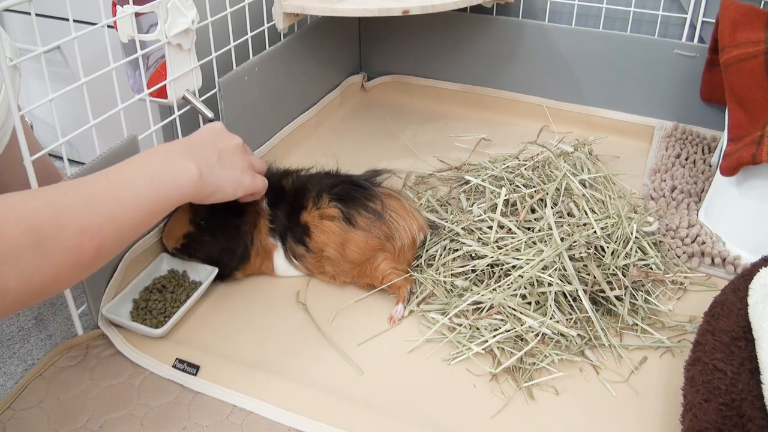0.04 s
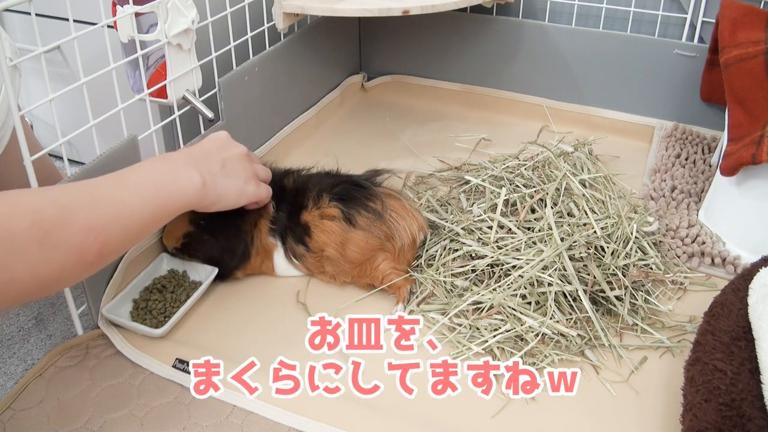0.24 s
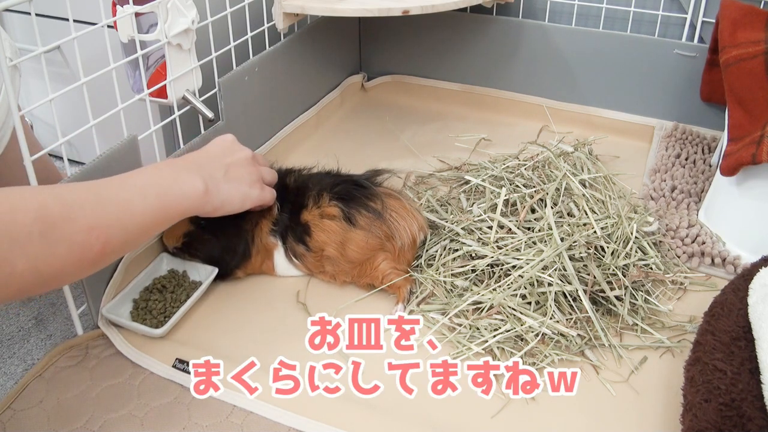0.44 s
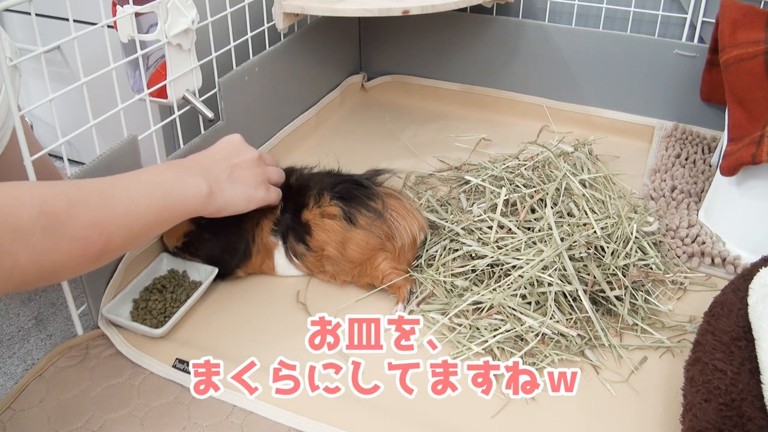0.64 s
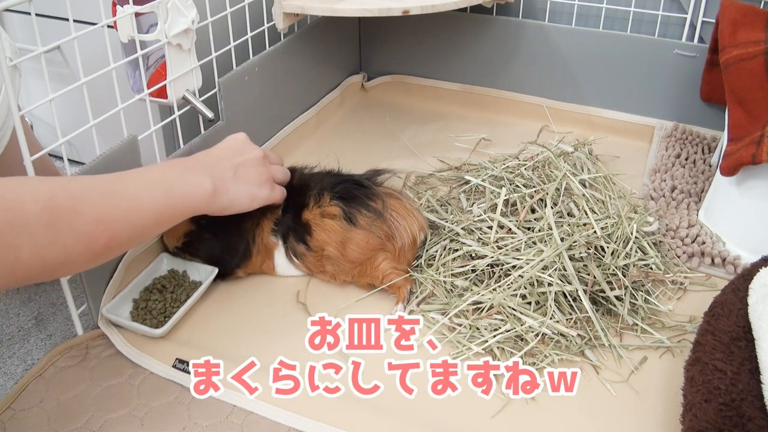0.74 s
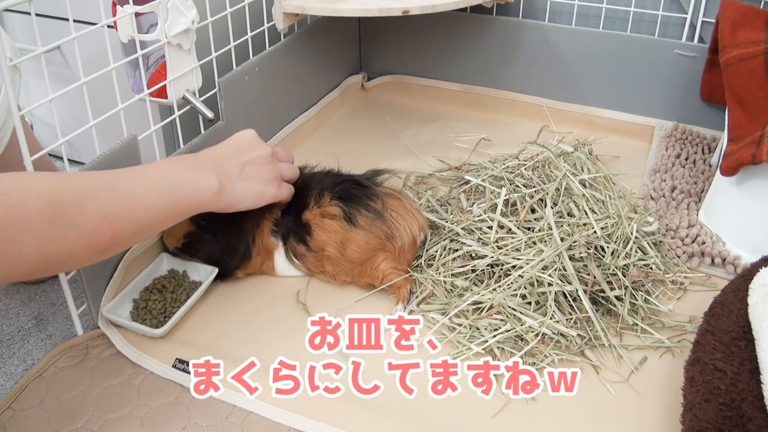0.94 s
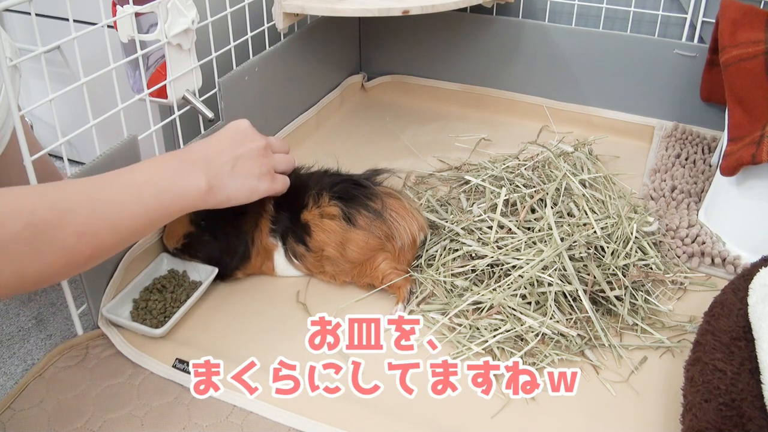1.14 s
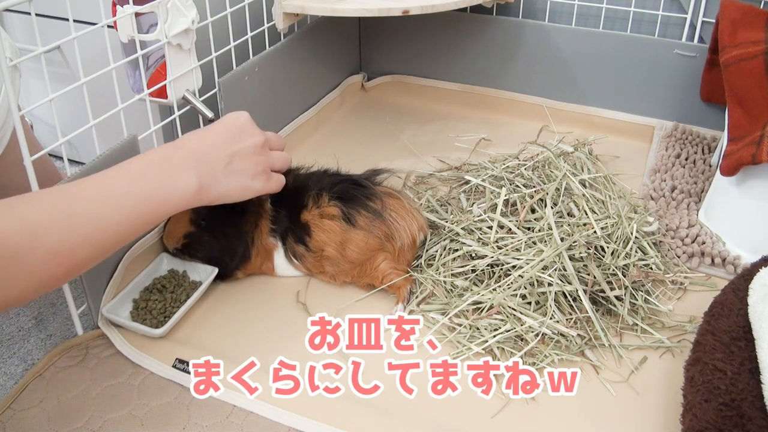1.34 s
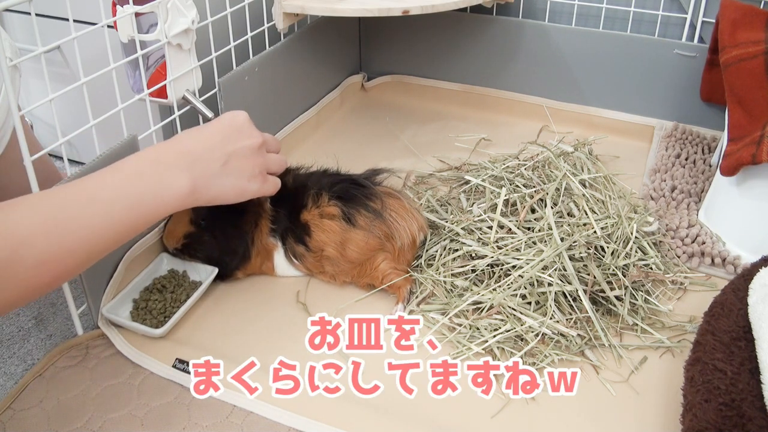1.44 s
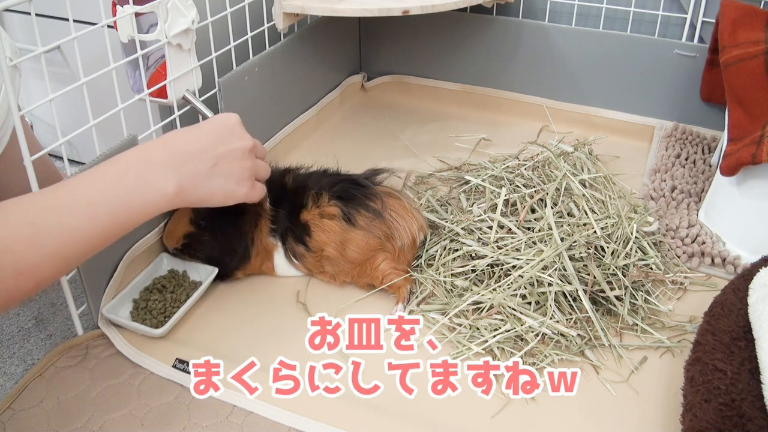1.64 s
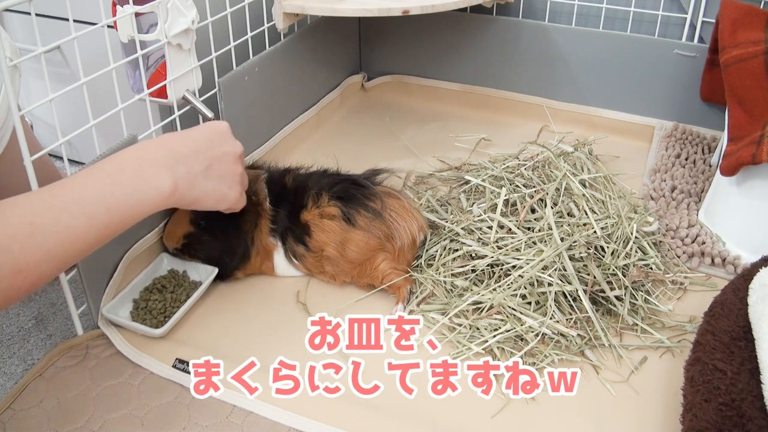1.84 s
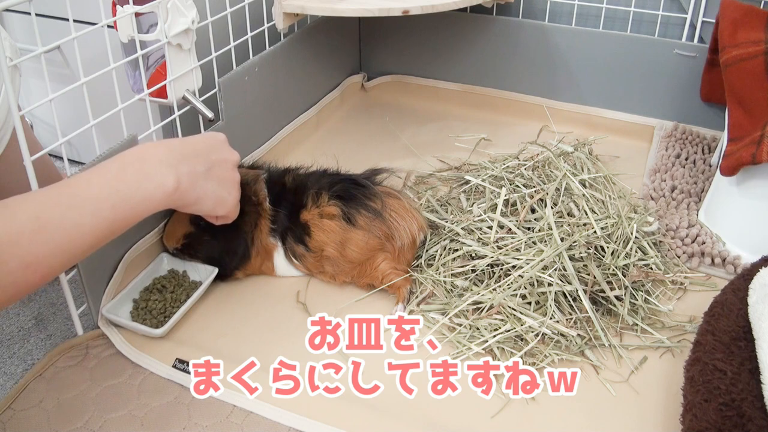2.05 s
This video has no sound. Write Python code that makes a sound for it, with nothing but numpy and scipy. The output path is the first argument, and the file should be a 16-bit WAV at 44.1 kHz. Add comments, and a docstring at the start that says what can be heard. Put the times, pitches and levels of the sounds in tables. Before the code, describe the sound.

Close by in a small room, a guinea pig makes two quick runs of tiny purring pips and grunts, followed by sparse, lower chuts. Faint stroking rustle and a few dull bumps sit over a quiet ventilation hum.

```python
"""A guinea pig purrs in two short bursts, then gives a few soft low chuts, as its head is stroked.
Each burst is a run of tiny voiced notes: clean hoots, pips that open with a click, rough falling grunts.
It sits in its pen close to a stereo pair of microphones, a little to the left, in a small room.
Fur and hay rustle faintly under the hand, with a few dull bumps; ventilation hums behind."""
import sys
import numpy as np
from scipy import signal
from scipy.fft import rfft, irfft
from scipy.io import wavfile

SR = 44100
rng = np.random.default_rng(int(sys.argv[2]) if len(sys.argv) > 2 else 0)


def wav_record(signal):
    """Record a signal, one row per channel, as 16-bit PCM in the file named by sys.argv[1]."""
    frames = np.transpose(np.atleast_2d(signal))
    bounded = np.clip(frames, -1, 1)
    # unit amplitude maps onto the largest positive 16-bit level
    quanta = np.round(bounded * 32767).astype(np.int16)
    wavfile.write(sys.argv[1], SR, quanta)


N = 92610
TIME = np.arange(N) / SR


def from_db(db):
    """Decibels to gain."""
    return 10 ** (np.asarray(db) / 20)


def unit_rms(x):
    """Scale to an rms of 1."""
    return x / np.sqrt(np.mean(x ** 2) + 1e-20)


def at_hz(table, hz):
    """Read a table on a log-frequency axis."""
    table_hz, values = np.transpose(table)
    return np.interp(np.log(np.maximum(hz, 1)), np.log(table_hz), values)


def colour(noise, spectrum):
    """Filter a noise by a table of gains, then scale it to unit rms."""
    size = noise.shape[-1]
    gain = from_db(at_hz(spectrum, np.fft.rfftfreq(size, 1 / SR)))
    return unit_rms(irfft(rfft(noise) * gain, size))


def drift(rate_hz):
    """A smooth random wander of about unit rms, mostly slower than rate_hz."""
    hz = np.fft.rfftfreq(2 * N, 1 / SR)
    slow = rfft(rng.standard_normal(2 * N)) / (1 + (hz / rate_hz) ** 2)
    return unit_rms(irfft(slow))[:N]


# How alike the two microphones hear a diffuse sound: frequency_hz, correlation
MIC_LIKENESS = [(60, 0.97), (120, 1), (240, 0.57), (480, 0.3), (950, -0.086), (1890, -0.097), (3770, 0.049),
                (7520, 0.26), (15000, 1)]
def diffuse(noise_pair, spectrum):
    """Two unrelated noises become one sound all around the microphones, nearly mono in the bass."""
    alike = np.clip(at_hz(MIC_LIKENESS, np.fft.rfftfreq(N, 1 / SR)), -.99, .995)
    mid, side = rfft(noise_pair) * np.sqrt([1 + alike, 1 - alike])
    return colour(irfft([mid + side, mid - side], N), spectrum)


# Rush of air in the room behind the pen: frequency_hz, gain_db
AIR_SPECTRUM = [(12, -32), (20, -17), (38, -8.5), (106, -1.5), (252, -9.5), (289, -7), (371, -6),
                (404, -5.5), (580, -7), (704, -7), (856, -8), (957, -7.5), (1720, -11), (2530, -14.5),
                (5680, -28), (7290, -33.5), (15500, -56.5)]
# Hum lines of the ventilation: pitch_hz, level_db
HUM_LINES = [(40, -64), (94, -66), (236.5, -64.5), (357.5, -61), (592, -68.5)]
def ventilation(air_db=-48, hum_waver=.31, wander_hz=1.32):
    """A steady rush of air fills the room, with a wavering hum in the centre."""
    hum = np.zeros(N)
    for hz, db in HUM_LINES:
        amplitude = np.sqrt(2) * from_db(db) * (1 + hum_waver * drift(rate_hz=12))
        cycles = rng.random() + np.cumsum(hz + wander_hz * drift(rate_hz=4.3)) / SR
        hum += amplitude * np.sin(2 * np.pi * cycles)
    return hum + from_db(air_db) * diffuse(rng.standard_normal((2, N)), AIR_SPECTRUM)


# Course of the rustle under the hand: time_s, level_db
STROKE_LEVELS = [(0, -63), (.15, -78), (.22, -69.5), (.45, -68), (.7, -66), (.83, -65), (.87, -62.5),
                 (.97, -58.5), (1.02, -64.5), (1.16, -64.5), (1.38, -70), (1.7, -66), (1.9, -70),
                 (2.1, -68.5)]
# Fur and hay, heard from beside the pen: frequency_hz, gain_db
RUSTLE_SPECTRUM = [(800, -13), (2000, -3.5), (4000, -1), (7000, -9), (10000, -22), (15000, -26)]
def stroking(grains_per_s=6600, spread_db=5.5, patchy_db=3):
    """Fur and hay shift under the hand in a faint, patchy stream of tiny ticks."""
    sizes = from_db(spread_db * np.minimum(rng.exponential(1, (2, N)), 4))
    signs = rng.choice([-1, 1], (2, N))
    grains = sizes * signs * (rng.random((2, N)) < grains_per_s / SR)
    level_db = np.interp(TIME, *np.transpose(STROKE_LEVELS)) + patchy_db * drift(rate_hz=28)
    return from_db(level_db) * diffuse(grains, RUSTLE_SPECTRUM)


def swells(rows):
    """An envelope with one bell-shaped rise and fall for each row."""
    return sum(from_db(db) * np.exp(-.5 * ((TIME - centre) / width) ** 2) for centre, width, db in rows)


# Passes of the fingers through the fur: centre_s, width_s, level_db
FINGER_PASSES = [(.075, .008, -73), (.28, 0.0074, -71), (.366, .007, -74), (.52, .06, -75.5),
                 (.566, .008, -77), (.73, .0063, -67.5), (.83, 0.043, -77), (1.02, 0.016, -70),
                 (1.09, .028, -72), (1.145, .012, -72.5), (1.31, 0.048, -75), (1.435, .01, -74),
                 (1.51, .024, -73), (1.73, .015, -77), (1.87, .008, -77), (1.955, .017, -72.5)]
# Hiss of fur at close range: frequency_hz, gain_db
FUR_SPECTRUM = [(2000, -13), (5000, 1.5), (8500, 6), (12000, -2), (15000, -7)]
def brushing():
    """Each pass of the fingers through the fur is a short, airy swish."""
    return swells(FINGER_PASSES) * diffuse(rng.standard_normal((2, N)), FUR_SPECTRUM)


# The animal's notes, close up: start_s, length_s, attack_s, level_db, level_change_db,
# start_pitch_hz, middle_pitch_hz, end_pitch_hz, overtones_db, roughness (0 to 1)
PURR_AND_CHUT_NOTES = [ (0.209, 0.037, 0.021, -39, -1.5, 538, 715, 698, -10, 0.04),
                       (0.271, 0.0065, 0.0014, -31.5, -6.5, 830, 785, 820, -11, 0.1),
                       (.3039, 0.029, 0.0016, -32.5, 2, 708, 741, 738, -6, 0.06),
                       (0.334, 0.0079, 0.0014, -41.5, -7.5, 684, 667, 660, -1, 0.73),
                       (0.362, 0.0053, .002, -38.5, -2, 810, 836, 830, -16, 0),
                       (0.4039, 0.0122, 0.0022, -39, 0, 774, 629, 630, -3.5, 0.23),
                       (.416, 0.0236, .0012, -43, -3.5, 640, 687.4, 590, 2.5, 0.13),
                       (.452, 0.0061, .0035, -38, -3.5, 680, 704, 760, -8, 0.25),
                       (.648, 0.013, 0.0057, -49.5, -1.5, 423, 401, 380, -8.5, 0.37),
                       (.666, 0.031, .014, -46.5, -1.5, 791, 687, 563, 0.5, 0.55),
                       (0.7233, 0.0098, 0.0052, -32, -2, 825, 804, 793, -25, 0.02),
                       (0.7602, .017, 0.0014, -34, -4, 705, 618, 563, 0, 0.28),
                       (0.7772, .011, .0015, -42, -0.5, 613, 593, 580, 0, 0.76),
                       (.792, 0.0046, 0.0017, -41, -0.5, 640, 640, 600, -1, 0.7),
                       (.802, 0.0093, 0.0037, -46.5, 1, 554, 580, 640, -4, 0.77),
                       (0.8148, 0.012, 0.0036, -36.5, 0, 706, 775, 814, -13, 0.22),
                       (0.8573, 0.012, 0.0013, -38.5, -2, 580, 499, 448, -4.5, 0.43),
                       (0.874, 0.012, 0.0014, -43, -0.5, 490, 525, 530, 0.5, 0.52),
                       (0.885, 0.026, 0.0041, -46.5, -2.5, 550, 595, 532, 2.5, 0.17),
                       (.914, 0.014, .003, -48.5, -1, 563, 600, 650, -6, 0.48),
                       (1.197, 0.029, 0.0056, -40.5, -10.5, 332, 369.5, 356, -10, 0.2),
                       (1.233, 0.022, 0.0027, -51, 0, 507, 568, 570, -15, 0.83),
                       (1.272, 0.015, 0.0044, -47, -6, 343, 355, 340, -12, 0),
                       (1.647, .026, 0.0048, -37.5, -7, 347, 356.5, 383, -14.5, 0.08),
                       (1.748, 0.0059, 0.0032, -39, -2, 380, 380, 356, -17.5, 0),
                       (1.758, 0.012, .003, -44.5, -5, 374, 362, 360, -21, .1)]
# What throat and mouth pass of the overtones: frequency_hz, gain_db
THROAT_RESPONSE = [(400, -7), (750, 5.5), (1000, -1.5), (1220, 1.5), (1480, -14.5), (1800, -16), (2250, -8),
                   (2800, -21.5), (4200, -36), (8000, -69)]
# What they pass of the rasp: frequency_hz, gain_db
RASP_SPECTRUM = [(150, -3), (400, 10.5), (750, -1), (1200, 13), (1520, -23), (2300, -3.5), (3200, -19),
                 (5000, -42), (10000, -55)]
def voice(flutter_hz=230, jitter_depth=.12, shimmer_depth=.45, half_pitch_db=-8, rasp_db=1):
    """Gliding notes shaped by the throat; roughness shakes pitch and level and adds a pulsed rasp."""
    release_s = .002
    notes = np.zeros(N)
    jitter, shimmer = jitter_depth * drift(flutter_hz), shimmer_depth * drift(flutter_hz)
    rasp = from_db(rasp_db) * colour(rng.standard_normal(N), RASP_SPECTRUM)
    for start, length, attack, db, change_db, *pitches_hz, overtones_db, rough in PURR_AND_CHUT_NOTES:
        span = slice(int(start * SR), int((start + length + 10 * release_s) * SR))
        t = TIME[span] - TIME[span][0]
        progress = np.minimum(t / length, 1)
        hz = np.polyval(np.polyfit([0, .5, 1], pitches_hz, 2), progress)
        phase = 2 * np.pi * np.cumsum(hz * (1 + rough * jitter[span])) / SR
        overtones = sum(from_db(overtones_db + at_hz(THROAT_RESPONSE, k * hz)) * np.sin(k * phase)
                        for k in range(2, 10))
        alternation = from_db(half_pitch_db) * np.cos(phase / 2)   # strong and weak cycles take turns
        tone = np.sqrt(2) * (np.sin(phase) + overtones) * (1 + rough * (shimmer[span] + alternation))
        pulsed_rasp = rough * rasp[span] * (1 + .5 * np.cos(phase))
        envelope = np.minimum(t / attack, 1) * np.exp(-np.maximum(t - length, 0) / release_s)
        notes[span] += from_db(db + change_db * progress) * envelope * (tone + pulsed_rasp)
    return notes


def ring(x, hz, t60_s):
    """A resonance: a unit click starts a dying sine of height 1."""
    radius = np.exp(-np.log(1000) / (t60_s * SR))
    angle = 2 * np.pi * hz / SR
    return signal.lfilter([0, np.sin(angle)], [1, -2 * radius * np.cos(angle), radius ** 2], x + 1e-18)


# The throat snapping open or shut: start_s, level_db
THROAT_SNAPS = [(.247, -37), (0.2706, -36), (0.7255, -33)]
# Resonances of the mouth: pitch_hz, gain_db, t60_s
MOUTH_MODES = [(1176, 0.5, 0.017), (2180, -2, 0.012), (2710, -9.5, 0.017)]
def throat_clicks(soften_hz=3240):
    """Each snap of the throat rings the mouth for a few milliseconds."""
    snaps = np.zeros(N)
    for start, db in THROAT_SNAPS:
        snaps[int(start * SR)] = from_db(db)
    softened = signal.sosfilt(signal.butter(2, soften_hz, fs=SR, output="sos"), snaps + 1e-18)
    return sum(from_db(db) * ring(softened, hz, t60_s) for hz, db, t60_s in MOUTH_MODES)


# Tone of the walls' reflections around the pen: frequency_hz, gain_db
ROOM_SPECTRUM = [(150, 4), (400, -1.5), (750, 1), (1300, 4.5), (2500, 1), (8000, 2)]
def small_room(x, level_db=-10, t60_s=.33, delay_s=.0067):
    """Near walls return dense, quickly dying reflections, different at each microphone."""
    t = TIME[:SR // 2]
    decay = np.exp(-np.log(1000) * t / t60_s) * (t > delay_s)
    tails = colour(rng.standard_normal((2, len(t))), ROOM_SPECTRUM) * decay
    tails /= np.sqrt(np.sum(tails ** 2, axis=1, keepdims=True))
    return from_db(level_db) * signal.fftconvolve(x[None], tails, axes=1)[:, :N]


def guinea_pig(lean_db=5.5, lean_above_hz=1070):
    """The animal up close, its upper voice stronger at the left microphone, the room behind it."""
    direct = voice() + throat_clicks()
    upper = signal.sosfiltfilt(signal.butter(2, lean_above_hz, "high", fs=SR, output="sos"), direct)
    lower = direct - upper
    mic_gains = from_db([[lean_db / 2], [-lean_db / 2]])
    return lower + upper * mic_gains + small_room(direct)


# Soft low bumps: centre_s, width_s, level_db
BUMP_SWELLS = [(.28, .03, -53), (.45, 0.011, -46), (.6, .02, -52.5), (.98, 0.033, -47.5),
               (1.825, 0.038, -48)]
# Their rumble at the microphones: frequency_hz, gain_db
BUMP_SPECTRUM = [(30, -7.5), (65, -16.5), (95, -1.5), (150, -18), (300, -29), (1000, -77)]
def bumps():
    """A dull rumble swells now and then, alike in both microphones."""
    return swells(BUMP_SWELLS) * colour(rng.standard_normal(N), BUMP_SPECTRUM)


def scene():
    """Animal, hand and room, heard from beside the pen."""
    return guinea_pig() + stroking() + brushing() + bumps() + ventilation()


def record(dry):
    """The recorder cuts the top treble steeply."""
    cutoff_hz = 15300
    return signal.sosfilt(signal.ellip(10, .1, 80, cutoff_hz, fs=SR, output="sos"), dry)


dry = scene()
out = record(dry)
wav_record(out)
```